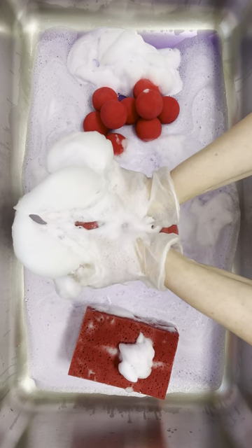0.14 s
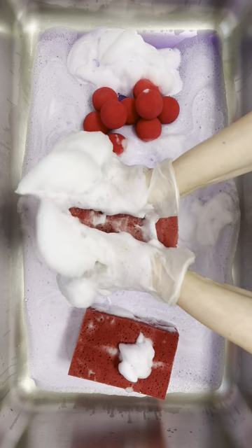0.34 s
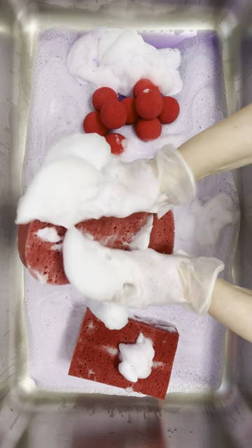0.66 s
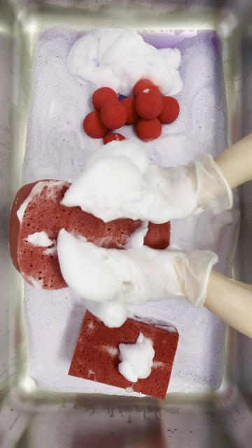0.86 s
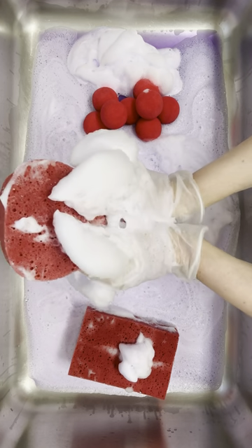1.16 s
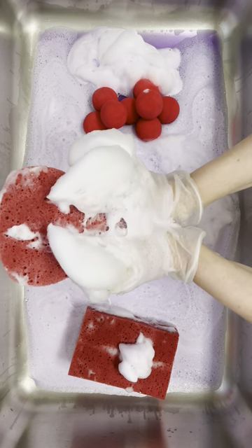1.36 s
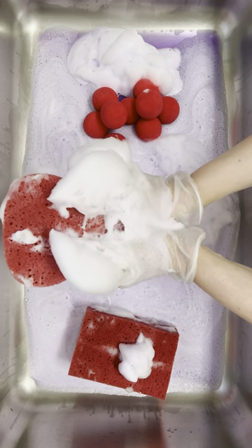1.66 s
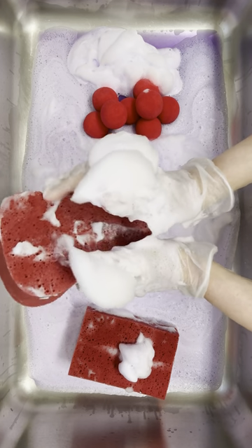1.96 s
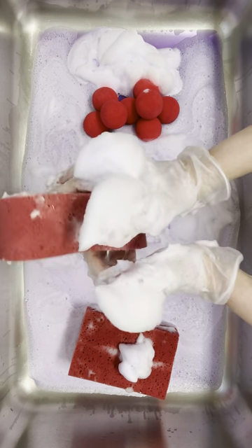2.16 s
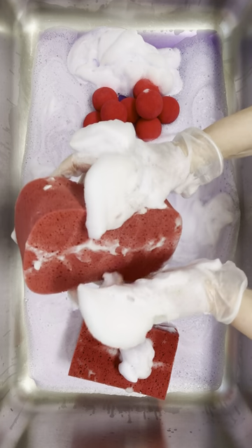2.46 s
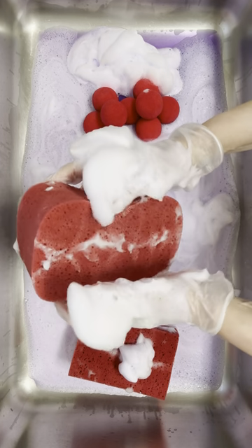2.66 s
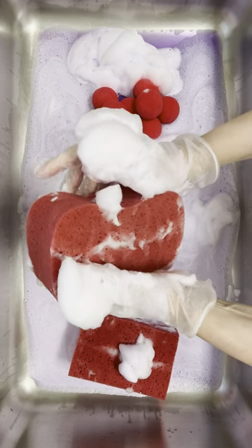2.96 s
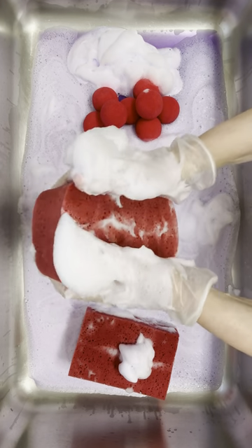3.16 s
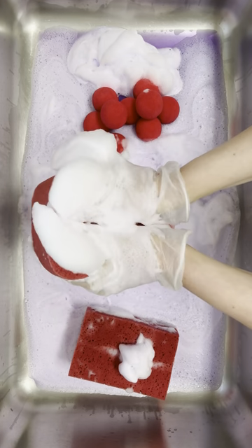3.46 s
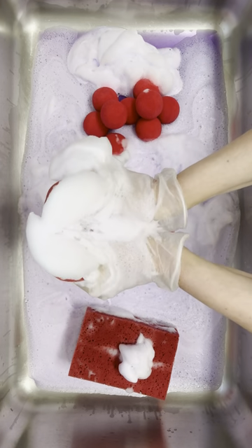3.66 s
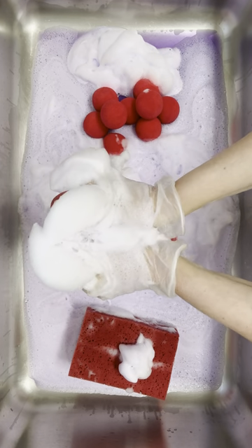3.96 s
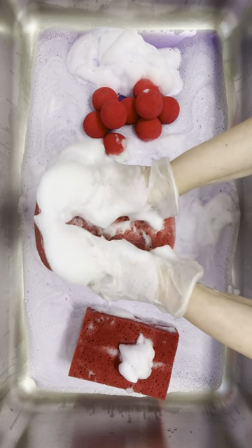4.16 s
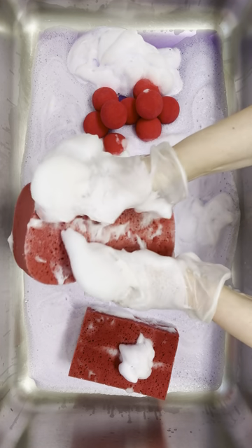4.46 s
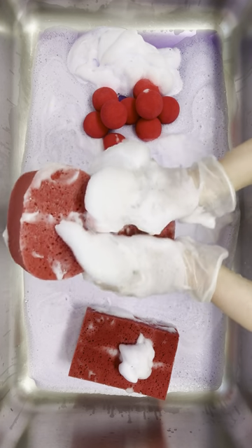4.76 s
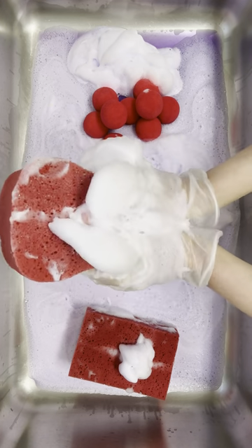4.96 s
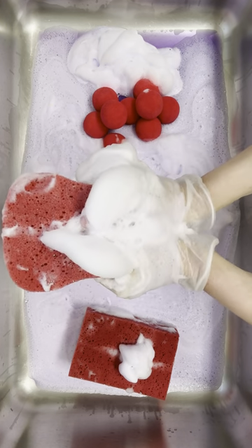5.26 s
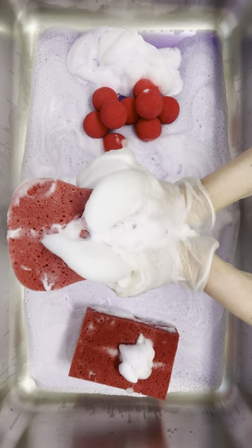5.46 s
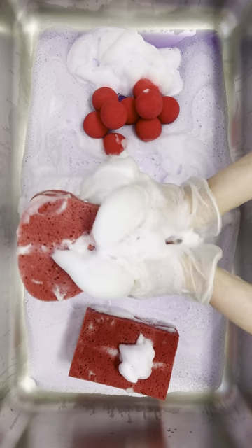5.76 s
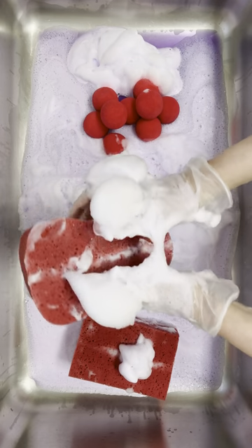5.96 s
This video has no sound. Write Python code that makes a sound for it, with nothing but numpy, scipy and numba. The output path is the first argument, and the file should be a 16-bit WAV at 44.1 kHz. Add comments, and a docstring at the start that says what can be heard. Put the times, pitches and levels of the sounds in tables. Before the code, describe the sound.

Close stereo sound of a soaked sponge handled by gloved hands among suds in a steel tub. At 0 s the end of a squeeze bursts out, a loud wet blop and squelch gone by 0.15 s. Light foamy crackles and air sucking back follow until 0.9. A full squeeze builds from 0.9, loudest around 1.3 to 1.5, with gurgling low pops and dense bubbly fizz, then lets go with a small falling plop at 1.6. Soft squishy crackles continue from 1.7 to 3.2. Another squeeze swells from 3.3, peaking near 3.7 to 3.85 with brighter fizz, and stops by 3.95; a wet tick comes at 4.1. After lighter crackling, the last squeeze grows from 4.7, is strongest at 5.2 to 5.5, and fades by 5.7, with small pops near 5.85. Short hollow metallic resonance, faint wavering low hum, room noise and steady hiss throughout.

```python
"""Sponge squeezed in a steel tub

Gloved hands squeeze a soaked foam sponge among suds: crowds of tiny ringing bubbles and hissing air
gurgle, squelch and crackle, while single damped sines make the big pockets pop and one plop fall.
The tub's resonances and a scattered noise tail ring with all of it. Behind lie a low wavering hum,
an even treble hiss and shaped room noise; left and right differ in phase and a little in level."""
import sys
import numpy as np
from scipy import signal
from scipy.fft import rfft, irfft, next_fast_len
from scipy.io import wavfile
from scipy.ndimage import uniform_filter1d
from numba import njit

SR = 44100
rng = np.random.default_rng(int(sys.argv[2]) if len(sys.argv) > 2 else 0)


def put_to_file(sound):
    """Save the sound as 16-bit audio at rate SR, in the file named by the first command-line argument."""
    columns = np.atleast_2d(sound).T  # one column per channel
    safe = np.clip(columns, -1, 1)
    whole_steps = np.round(safe * 32767)
    wavfile.write(sys.argv[1], SR, whole_steps.astype(np.int16))


N = 269447
SIZE = next_fast_len(N + SR // 2)  # room for filter tails
HZ = np.fft.rfftfreq(SIZE, 1 / SR)

# The end of a squeeze already under way, then three full ones; all levels ahead of the tub:
# [t/s, froth level/dB, squelch re froth/dB, gurgle re froth/dB]
SQUEEZES = [
    [(0.0, -42, -2.5, 5.5), (0.012, -41, 11, 1), (0.052, -45, -1.5, -5.5), (0.106, -49.5, 2, -5),
     (0.15, -78, 5, 9)],
    [(0.90, -65, -5, -17), (0.95, -53, -4, -4), (1.07, -55.5, 6, -1.5), (1.12, -51.5, 0.5, -1.5),
     (1.32, -44, 3.5, -4.5), (1.42, -43.5, 2.5, -0.5), (1.53, -45.5, 4.5, -3), (1.6, -53, -1.5, -4),
     (1.635, -58, 0, -4), (1.69, -74, 15, 7)],
    [(3.3, -60.5, -1, -7), (3.4, -54.5, -2.5, -7), (3.46, -48, -2.5, -3), (3.54, -46, -1, -7.5),
     (3.69, -43, 1, -0.5), (3.83, -44, 2.5, -6), (3.89, -48, -1.5, -8), (3.94, -62, 3, 6.5),
     (3.98, -82, -7, 13)],
    [(4.72, -62.5, -6, 3), (4.79, -54, -3, -8), (4.87, -56, -5, 1), (5.0, -49.5, -1.5, -5),
     (5.12, -47, 1, -1.5), (5.22, -43.5, -0.5, -5.5), (5.3, -44, 2, -7), (5.36, -44, 1.5, -5),
     (5.42, -46, 0.5, -8.5), (5.5, -46, 0, -5.5), (5.6, -52, 1.5, -9), (5.68, -63, 1, -2)],
]
# One value per squeeze: finest froth re froth [level/dB]
SQUEEZE_FINE_DB = [-10, -13.5, -13, -16]
# One value per squeeze: pores re their usual share [level/dB]
SQUEEZE_PORES_DB = [-3, -0.5, 0, 1.5]
# One value per squeeze: pocket pitch re the usual [ratio]
SQUEEZE_POCKET_RATIO = [0.67, 0.84, 1.4, 1]
# Lighter shifts of the hands, air gasping back into the sponge among them:
# [loudest at t/s, rise/s, fade/s, froth level/dB, squelch, gurgle and finest froth re froth/dB]
SHIFTS = [(0.245, 0.054, 0.18, -50.5, -16, -18, -8.5), (0.32, 0.13, 0.1, -52, -1, -3.5, -9.5),
          (0.52, 0.78, 0.17, -57, -2.5, -1.5, -8), (0.61, 0.1, 0.034, -61.5, 8.5, 8, -7),
          (0.72, 0.27, 0.088, -53.5, -3.5, -6, -6), (0.8, 0.15, 0.27, -61.5, -11, -4, 1),
          (1.716, 0.005, 0.071, -52.5, 4.5, -2, -9), (1.75, 0.07, 0.076, -51.5, 0.5, -3, -11),
          (1.79, .06, 0.15, -58, 3.5, -8, -15), (1.95, 0.35, 0.19, -55.5, -4.5, -5, -7.5),
          (2.121, 0.075, 0.19, -54, -4.5, -3.5, -5), (2.3, 0.043, 0.15, -60, 1, 2.5, -9),
          (2.43, 0.21, 0.2, -58, -4.5, -3, -10), (2.52, 0.062, 0.075, -68, 7.5, 9, -13),
          (2.695, 0.097, 0.073, -53, -7.5, -12, -5), (2.84, 0.47, 0.12, -61, -9, 2.5, -6),
          (2.985, 0.14, 0.13, -57.5, -2.5, 1, -7), (3.16, 0.25, 0.17, -63.5, -17, -6, -1),
          (3.23, 0.15, 0.19, -58.5, -5, -5.5, -10), (4.055, 0.043, 0.12, -49.5, -5, -6, -17),
          (4.14, 0.2, 0.17, -56, 2, -4, -9), (4.31, 0.44, 0.14, -56.5, -3, -6.5, -9),
          (4.51, 0.15, 0.21, -53.5, -2.5, -4.5, -12), (5.77, 0.054, 0.097, -59, -3, 3.5, -15),
          (5.855, 0.16, 0.12, -51, 2, -2, -15), (6.04, 0.53, 0.14, -59.5, 0, -4.5, -19)]
# The finest froth fizzes up: [t/s, level/dB, half-width to 1/e power/s]
FINE_BURSTS = [(1.42, -63, 0.068), (3.69, -54.5, .06), (3.86, -52, 0.028), (4.05, -55, .02),
               (5.47, -61, 0.063)]
# Colour of each bubble size, relative spectrum only: [f/Hz, level per Hz/dB]
GURGLE = [(70, -3), (100, 0), (135, 4), (170, 5.5), (235, -7.5), (340, -4), (450, -2), (700, -52)]
SQUELCH = [(300, -59), (480, -1.5), (720, 1), (1250, 2), (1450, 0.5), (1900, -7)]
PORES = [(1100, -3), (1450, -9), (1700, -2.5), (1900, 0), (2080, 0), (2350, -10.5), (3000, -23)]
FROTH = [(1600, -25), (2300, -4), (2600, 0.0), (4000, -1), (5500, -4), (7000, -6), (8200, -9), (9500, -17),
         (12000, -38)]
FINE_FROTH = [(6000, -30), (8000, -4), (9300, 1.5), (11500, -1.5), (14000, -.5), (16500, -.5)]
# Large air pockets bursting, ahead of onset swell and tub: [t/s, level/dB, starting f/Hz, t60/s]
POPS = [(0.007, -15.5, 850, 0.017), (0.008, -29, 1490, .012), (0.025, -38, 1910, .015),
        (0.011, -25, 278, 0.026), (0.012, -17.5, 670, 0.013), (0.02, -31, 310, 0.021),
        (0.058, -38.5, 350, .04), (0.277, -44, 700, 0.033), (0.319, -45, 1020, .03), (0.043, -37, 745, .02),
        (0.1, -35, 1395, 0.022), (0.024, -28, 4450, 0.0058), (1.114, -38.5, 227, 0.059),
        (1.201, -36, 210, 0.055), (1.27, -36, 190, .03), (1.29, -29, 160, .04), (1.398, -27, 153, 0.067),
        (1.479, -29, 150, 0.045), (1.735, -36, 146, 0.064), (1.3, -37, 940, 0.036), (1.325, -31, 260, .04),
        (1.348, -38, 925, .025), (1.368, -34, 840, 0.03), (1.366, -24.5, 220, 0.025),
        (1.401, -27, 800, 0.047), (1.406, -26.5, 332, 0.03), (1.431, -40, 252, 0.043),
        (1.445, -41, 318, 0.032), (1.47, -35, 910, .025), (1.482, -22.5, 322, 0.013),
        (1.513, -32, 1120, 0.036), (1.52, -34, 827, 0.049), (2.29, -48, 743, .04), (2.295, -49, 1950, .03),
        (2.52, -50, 1170, 0.044), (2.53, -45.5, 780, .03), (2.542, -49, 587, .04), (2.972, -46, 746, 0.049),
        (2.985, -46, 954, .04), (2.99, -45, 663, 0.039), (2.995, -51, 1110, 0.027), (3.44, -36.5, 160, .05),
        (3.735, -35.5, 335, 0.032), (3.84, -28, 140, 0.065), (3.522, -39, 770, .03),
        (3.558, -33, 1000, .025), (3.572, -33, 1190, 0.022), (3.565, -31.5, 220, 0.052),
        (3.607, -28.5, 310, 0.022), (3.585, -31, 1220, 0.021), (3.604, -29.5, 1180, 0.016),
        (3.626, -26.5, 230, 0.035), (3.663, -27, 200, 0.044), (3.685, -38, 253, 0.038),
        (3.737, -33, 1940, .02), (3.706, -31, 963, 0.086), (3.713, -25, 258, 0.023),
        (3.774, -21, 240, 0.021), (3.841, -25.5, 259, 0.038), (3.846, -29.5, 765, 0.024),
        (3.853, -32, 230, 0.026), (3.855, -31, 1890, 0.022), (4.113, -27.5, 993, 0.024),
        (4.114, -35.5, 725, 0.017), (5.024, -36, 155, .05), (5.07, -39, 160, 0.044), (5.119, -33, 140, .04),
        (5.194, -33, 1400, 0.025), (5.222, -25, 220, 0.026), (5.342, -23.5, 270, 0.023),
        (5.372, -35, 324, 0.025), (5.462, -34, 181, 0.031), (5.856, -32.5, 1120, 0.03),
        (5.845, -44.5, 705, 0.073), (5.87, -48, 704, 0.055), (5.908, -37, 1140, 0.024),
        (1.797, -38.5, 680, 0.017)]
# Partials of the plop, ahead of onset swell and tub: [starting f/Hz, level/dB, t60/s]
PLOP = [(3300, -40, .012), (2050, -33, 0.02), (1750, -35, .025), (1290, -32, .02), (1020, -32, .018),
        (780, -25, 0.016), (540, -29, 0.03), (450, -37, .05), (385, -43, .09), (300, -25, 0.024),
        (190, -34, .04)]
# Resonances of the tub's hollow: [f/Hz, width/Hz, level re direct sound/dB]
TUB = [(140.7, 21, -2.5), (234.5, 18, 5), (328, 7.2, -1), (336.4, 12.3, 9.5), (550, 25, -0.5),
       (718, 56, 1.5), (808, 8.5, -21), (944, 19, -1), (1153, 67, -6), (1348, 29, 0.5), (1547, 33, 0),
       (1720, 53, 0), (1874, 23, -5), (2450, 14, 4.5), (3255, 34, -7)]
# The hum swells, ahead of its waver: [t/s, level/dB, half-width to 1/e amplitude/s]
HUM_SWELLS = [(0.02, -53, .03), (0.39, -55, 0.04), (0.55, -49.5, .06), (0.66, -58, 0.035),
              (1.07, -53, 0.029), (1.2, -55, .03), (1.38, -50, .05), (1.54, -49, 0.055), (1.73, -55, 0.026),
              (2.35, -53, .035), (2.43, -65, 0.027), (2.58, -55, .03), (2.66, -49.5, 0.052),
              (3.015, -46, 0.03), (3.34, -55, 0.054), (3.52, -52, .03), (3.61, -45, .04),
              (3.85, -51, 0.035), (4.38, -53.5, 0.06), (4.58, -58, .04), (4.77, -53, .04),
              (5.235, -47, 0.037), (5.32, -52, .03), (5.72, -54, 0.044), (5.85, -48, 0.031)]
# Colour of the steady treble hiss: [f/Hz, level per Hz/dB]
HISS = [(2000, -4), (5000, 0.5), (9000, -2.5), (16500, -0.5)]
# Colour of the room noise: [f/Hz, level per Hz/dB]
ROOM = [(18, -27), (36, -19), (50, -2.5), (110, -7.5), (200, -15.5), (400, -16), (700, -24.5),
        (1500, -22.5), (3000, -32.5), (6000, -26.5), (10000, -28)]
# Standing waves of the room, relative to one another: [f/Hz, width/Hz, level/dB]
ROOM_MODES = [(343, 11, 1), (566, 71, 0.5), (1150, 12, -19), (1960, 60, -11)]
# Stereo spread, filter on the side signal: [f/Hz, level/dB]
DIFFUSE = [(40, -23), (120, -31.5), (250, -15), (600, -15), (1200, -9), (2000, -12), (2250, -13),
           (2600, -1), (3500, -13.5), (5000, -11), (6600, -11), (7200, -35), (8800, -64), (9600, -10),
           (16000, -16)]
# Phase between left and right: [f/Hz, lead of the left channel/rad]
LEFT_LEAD = [(0, 0), (3600, -.15), (4500, -.55), (5900, -1.5), (7250, -2.8), (7600, -np.pi), (8400, -np.pi),
             (9300, -4.15), (11000, -2 * np.pi), (12300, -2 * np.pi), (13400, -7.5), (15200, -3 * np.pi),
             (16000, -3 * np.pi)]
# Level between left and right: [f/Hz, left over right/dB]
LEFT_DB = [(300, 0.0), (1200, .2), (2600, 1.5), (4800, 1.2), (6500, 0.0)]

SHIFT_EDGE_DB = -20  # a shift at the ends of its rise and fade, re its peak
PORES_DB, PORES_SHARE = -2, 0.53  # pores re froth, and share of the squelch column they follow
POCKET_HZ, POCKET_HZ_PER_DB = 847, -1  # pockets between the palms at -55 dB froth; lower in louder froth
CLUMP_DB = 0.7  # unevenness shared by all bubble sizes
POP_GLIDE = 0.038  # octaves up as a pocket closes
PLOP_S, PLOP_GLIDE, PLOP_LATE_CYCLES = 1.6125, -0.38, 1  # time, octaves of fall, delay of each partial
TUB_TAIL_T60_S, TUB_TAIL_DB, TUB_OUT_DB = 0.3, -9, -1.0
HUM_HZ, HUM_DB = 77, -60  # centre pitch, and level between swells ahead of the waver
HISS_DB = -62
ROOM_DB, ROOM_MODES_DB = -55.5, -10.0  # noise level ahead of its drift; modes re the noise colour
LOW_HZ, TOP_HZ = 44.3, 15690  # edges of the band that is kept


def sponge():
    """Five bubble sizes driven by the hands, each a crowd with its own colour and ringing."""
    froth_db, squelch_db, gurgle_db, fine_db = hands()
    pores_db = froth_db + PORES_DB + PORES_SHARE * (squelch_db - froth_db)
    pocket_hz = POCKET_HZ + POCKET_HZ_PER_DB * (np.clip(froth_db, -75, -40) + 55)
    for rows, db, ratio in zip(SQUEEZES, SQUEEZE_PORES_DB, SQUEEZE_POCKET_RATIO):
        during = slice(int(rows[0][0] * SR), int(rows[-1][0] * SR))
        pores_db[during] += db
        pocket_hz[during] *= ratio
    pocket_hz *= 1 + 0.023 * walk(9)

    out = undb(gurgle_db) * swarm(GURGLE, per_s=260, cycles=4.8, scatter_db=0.5, air_share=0.65,
                                  patchy_db=1.0, glide=0.7)
    out += undb(squelch_db) * swarm(SQUELCH, per_s=700, cycles=6.0, scatter_db=2.0, air_share=0.44,
                                    patchy_db=-0.27, glide=0.31, centre_hz=pocket_hz, gather=0.45)
    out += undb(pores_db) * swarm(PORES, per_s=1000, cycles=7.3, scatter_db=1.5, air_share=0.29,
                                  patchy_db=0.5, glide=0.085)
    out += undb(froth_db) * swarm(FROTH, per_s=4000, cycles=29.0, scatter_db=1.5, air_share=0.67,
                                  patchy_db=1.02, glide=0.19)
    out += undb(fine_db) * swarm(FINE_FROTH, per_s=6900, cycles=3.1, scatter_db=14.5, air_share=0.68,
                                 patchy_db=1.5, glide=0.1)
    return out * undb(CLUMP_DB * walk(70))  # bubbles of all sizes come in clumps


def hands():
    """Levels in dB of froth, squelch, gurgle and finest froth: squeezes and shifts add up in power."""
    t = np.arange(N) / SR
    power = 1e-12
    for rows, fine_db in zip(SQUEEZES, SQUEEZE_FINE_DB):
        s, froth, squelch, gurgle = np.transpose(rows)
        layers = froth + np.array([0 * s, squelch, gurgle, fine_db + 0 * s])
        curves = [np.interp(t, s, db, left=-120, right=-120) for db in layers]
        power = power + undb(2 * np.array(curves))  # doubled dB turns amplitude into power
    for s, rise, fade, db, *layers_db in SHIFTS:
        away = np.where(t < s, (s - t) / rise, (t - s) / fade)
        contour = undb(2 * (db + SHIFT_EDGE_DB * away ** 1.51))
        balance = undb(2 * np.array([[0.0041, *layers_db]]).T)
        power = power + contour * balance
    for s, db, half in FINE_BURSTS:
        power[-1] += undb(2 * db) * np.exp(-((t - s) / half) ** 2)
    return 10 * np.log10(power)


def swarm(colour, per_s, cycles, scatter_db, air_share, patchy_db, glide, centre_hz=None, gather=0.0):
    """A crowd of bubbles over a size range, some louder, in patches, with air hissing between them."""
    when, pitch, strength = rng.random((3, int(per_s * N / SR)))
    start = (when * N).astype(np.int64)
    lo, hi = colour[1][0], min(colour[-2][0], 0.4 * SR)
    hz = lo * (hi / lo) ** pitch
    if centre_hz is not None:  # sizes gather around the pockets that the hands are closing
        hz = hz ** (1 - gather) * centre_hz[start] ** gather
    # cap the extra level so that no single bubble ticks out of the crowd
    extra_db = scatter_db * np.minimum(-np.log(1 - strength), 2.4)
    # weight rises with pitch, to flatten the crowd before it is coloured
    size = undb(extra_db) * hz / hi
    crowd = bubbles(start, hz, size, cycles, glide, N)
    air = rng.standard_normal(N)
    crowd = level(filt(crowd, gains(colour)), 0)
    air = level(filt(air, gains(colour)), 0)
    both = np.sqrt(1 - air_share) * crowd + np.sqrt(air_share) * air
    return both * undb(patchy_db * walk(45))


@njit
def bubbles(start, hz, size, cycles, glide, length):
    """Each bubble rings down for some cycles, its pitch rising by the glide fraction as it closes."""
    out = np.zeros(length)
    for k in range(len(start)):
        steps = cycles * SR / hz[k]
        step = np.exp(2j * np.pi * hz[k] / SR - 5.0 / steps)  # rotation and decay per sample
        bend = np.exp(2j * np.pi * hz[k] / SR * glide / steps)
        z = size[k] + 0j
        for i in range(start[k], min(start[k] + int(steps), length)):
            out[i] += z.imag
            z *= step
            step *= bend
    return out


def pops():
    """Large pockets burst one by one as rising damped sines; the hands let go with one falling plop."""
    out = np.zeros(N)
    rows = [(s, db, hz, t60, POP_GLIDE) for s, db, hz, t60 in POPS]
    # a delay counted in cycles brings the plop's lows in late
    rows += [(PLOP_S + PLOP_LATE_CYCLES / hz, db, hz, t60, PLOP_GLIDE) for hz, db, t60 in PLOP]
    for s, db, hz, t60, glide in rows:
        i = int(s * SR)
        out[i:i + SR // 5] += undb(db) * ring(hz, t60, glide, SR // 5)
    return out


def ring(hz, t60, glide, length):
    """A damped sine that swells over one cycle, its pitch sliding by some octaves within half its t60."""
    t = np.arange(length) / SR
    envelope = np.minimum(t * hz, 1) * 1000 ** (-t / t60)
    pitch = hz * 2 ** (glide * np.minimum(t / t60 * 2, 1))
    return envelope * np.sin(2 * np.pi * np.cumsum(pitch) / SR)


def tub():
    """Response of the tub: direct sound, hollow resonances and a short scattered tail."""
    t = np.arange(SR // 3) / SR
    tail = rng.standard_normal(SR // 3) * 1000 ** (-t / TUB_TAIL_T60_S)
    tail = undb(TUB_TAIL_DB) * tail / np.sqrt(np.sum(tail ** 2))
    return 1 + resonances(TUB) + rfft(tail, SIZE)


def resonances(modes):
    """Summed response of damped modes given as (f/Hz, width/Hz, level/dB)."""
    return sum(undb(db) / (1 + 2j * (HZ - hz) / width) for hz, width, db in modes)


def hum():
    """A low sine hum that wavers in pitch and level, swells and fades."""
    t = np.arange(N) / SR
    pitch = HUM_HZ * (1 + 0.078 * walk(14))
    tone = np.sqrt(2) * np.sin(2 * np.pi * np.cumsum(pitch) / SR)
    tone = tone * undb(2.3 * walk(30.0))
    swells = sum(undb(db) * np.exp(-((t - s) / half) ** 2) for s, db, half in HUM_SWELLS)
    floor = undb(HUM_DB + 0.68 * walk(7.32))
    return tone * np.hypot(floor, swells)


def hiss():
    """An even hiss in the treble: steady coloured noise."""
    return level(filt(rng.standard_normal(N), gains(HISS)), HISS_DB)


def room():
    """Room noise with a few standing waves, its level drifting slightly."""
    response = gains(ROOM) + undb(ROOM_MODES_DB) * resonances(ROOM_MODES)
    noise = level(filt(rng.standard_normal(N), response), ROOM_DB)
    return noise * undb(1.97 * walk(5.05))


def undb(db):
    """Amplitude factor from dB."""
    return 10 ** (np.asarray(db) / 20)


def level(x, db):
    """Set the RMS level in dB."""
    return x * undb(db) / np.sqrt(np.mean(x ** 2))


def gains(points):
    """Gain at every frequency from (f/Hz, level/dB) points, on a log axis; -80 dB outside them."""
    hz, db = np.transpose(points)
    return undb(np.interp(np.log(HZ + 1), np.log(hz), db, left=-80, right=-80))


def filt(x, response):
    """Apply a frequency response and trim to the scene's length."""
    return irfft(rfft(x, SIZE) * response, SIZE)[..., :N]


def walk(rate):
    """Random levels held 1 / rate s and slewed twice; spread near 1."""
    k = int(SR / rate)
    held = np.repeat(rng.standard_normal(N // k + 1), k)
    return 1.19 * uniform_filter1d(uniform_filter1d(held, k), k)[:N]


def scene():
    """Sponge and pops ring in the tub over the background; left and right from mid and side."""
    hollow = tub() * undb(TUB_OUT_DB)
    mid = filt(sponge() + pops(), hollow) + room() + hum() + hiss()
    # bubbles off to either side are stronger in one channel than the other; room noise spreads too
    side = filt(filt(sponge(), hollow) + room(), gains(DIFFUSE))
    return np.array([mid + side, mid - side])


def record(dry):
    """Left and right differ in phase and a little in level; the deep bass and the top are cut."""
    lead = np.interp(HZ, *np.transpose(LEFT_LEAD)) / 2  # half to each channel
    lean = np.interp(HZ, *np.transpose(LEFT_DB)) / 2
    pair = filt(dry, undb([lean, -lean]) * np.exp(1j * np.array([lead, -lead])))
    low_cut = signal.butter(2, LOW_HZ, "high", fs=SR, output="sos")
    top_cut = signal.ellip(12, 0.2, 80, TOP_HZ, fs=SR, output="sos")
    return signal.sosfilt(top_cut, signal.sosfilt(low_cut, pair))


dry = scene()
out = record(dry)
put_to_file(out)
```